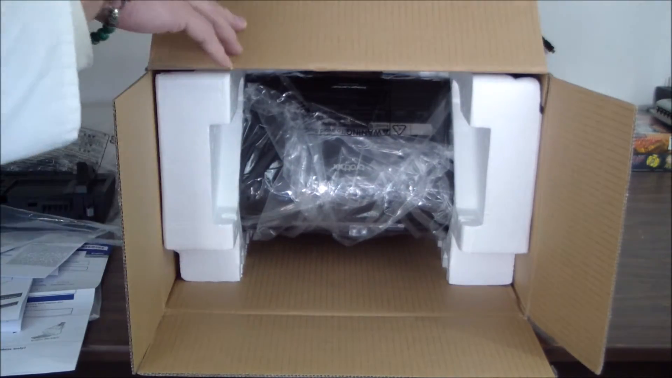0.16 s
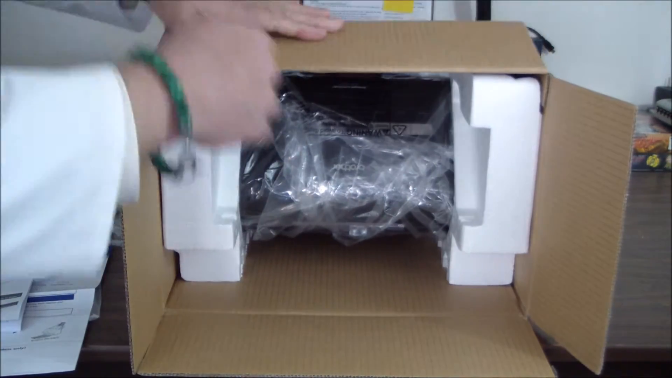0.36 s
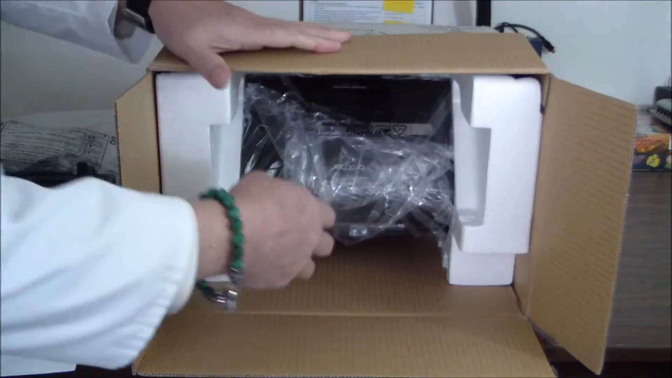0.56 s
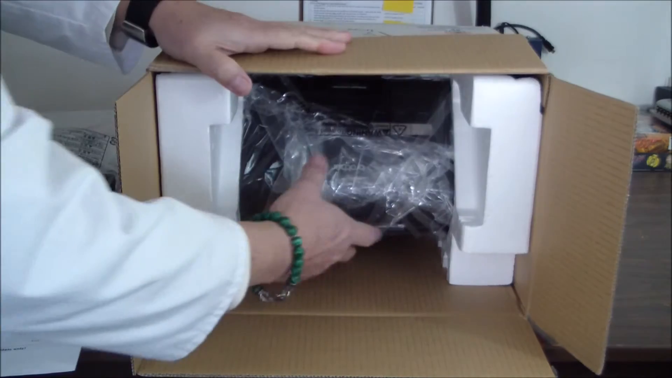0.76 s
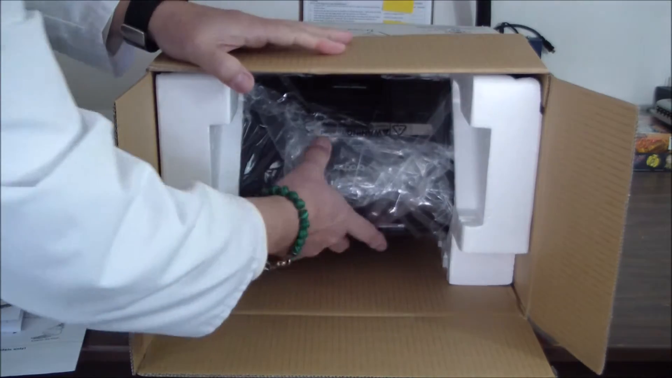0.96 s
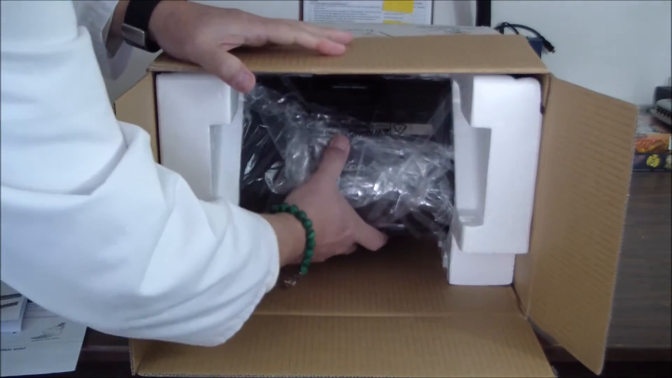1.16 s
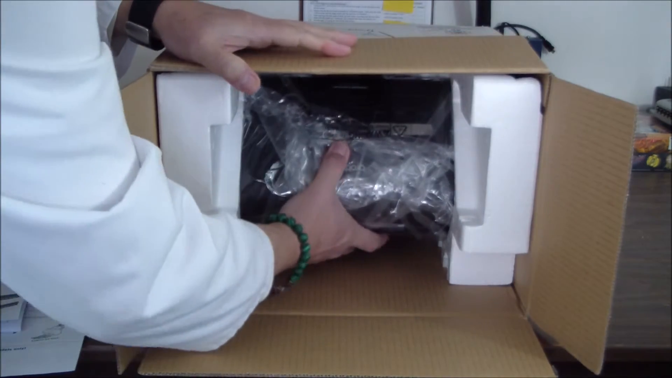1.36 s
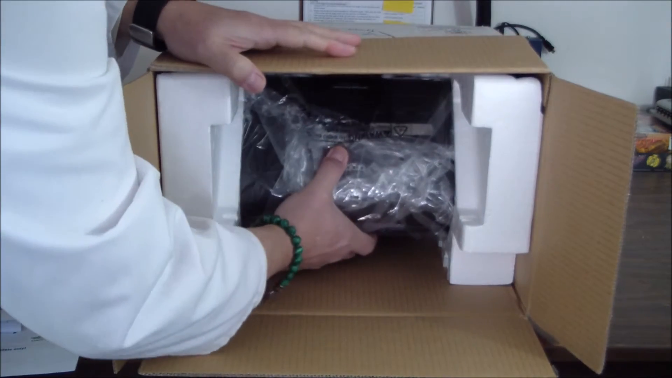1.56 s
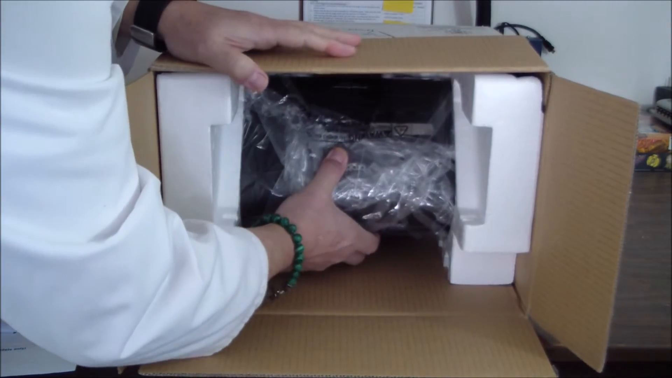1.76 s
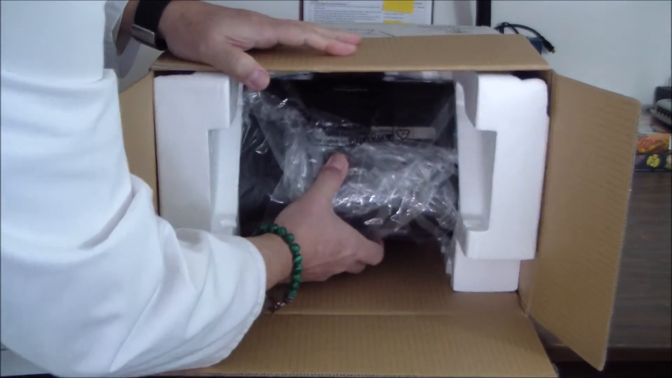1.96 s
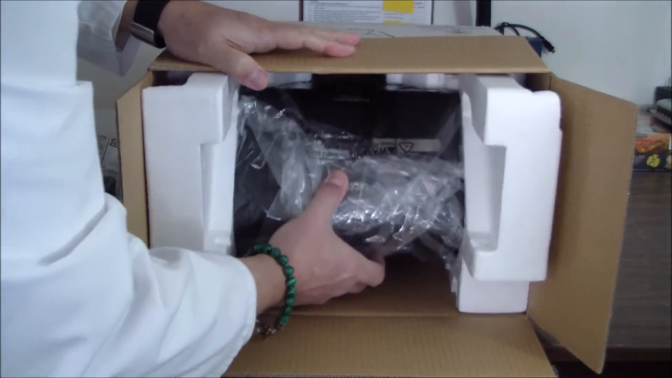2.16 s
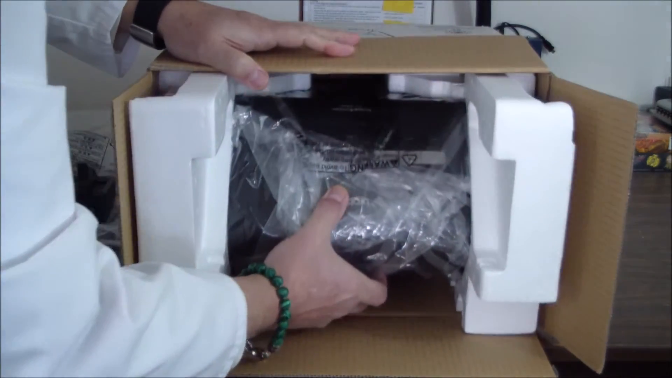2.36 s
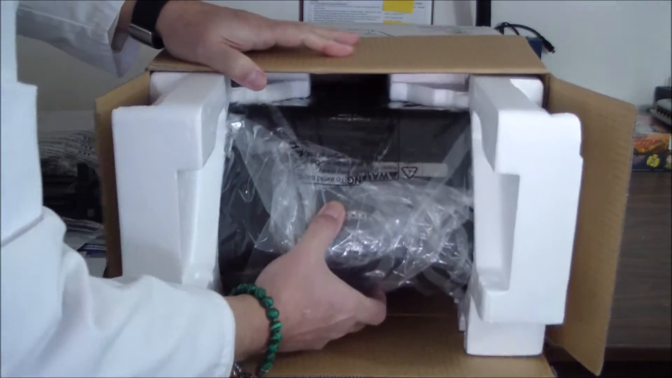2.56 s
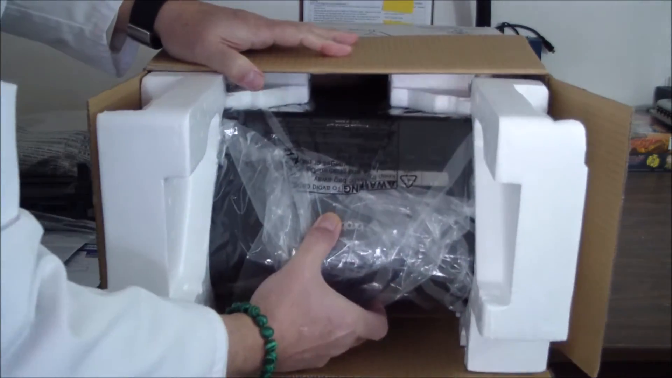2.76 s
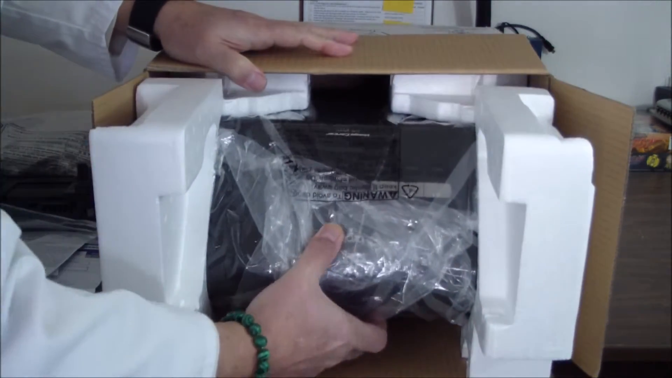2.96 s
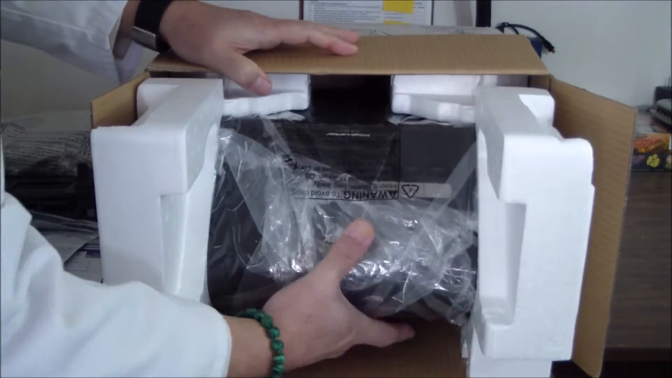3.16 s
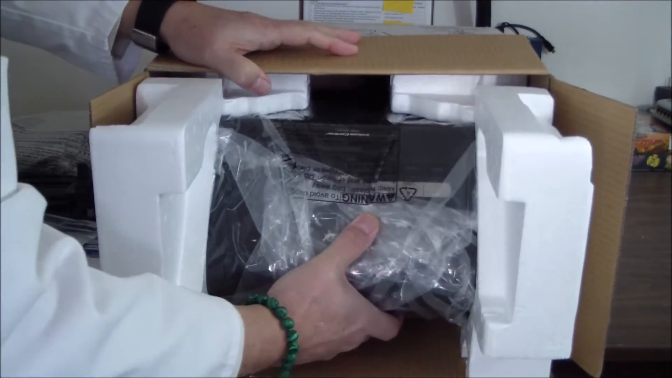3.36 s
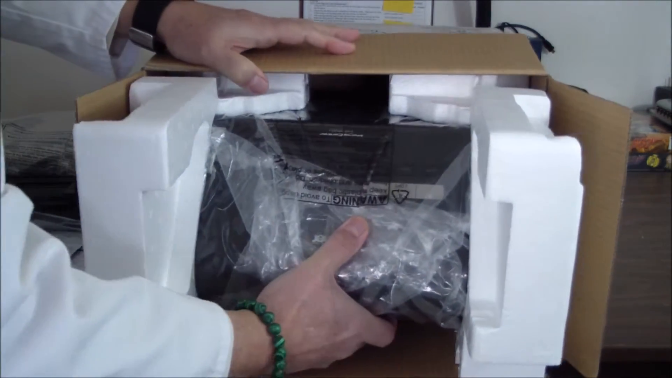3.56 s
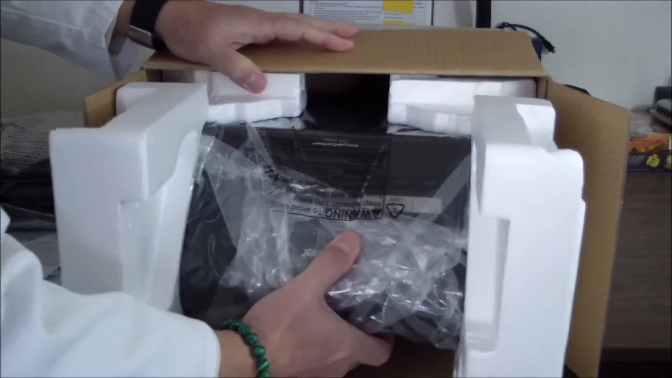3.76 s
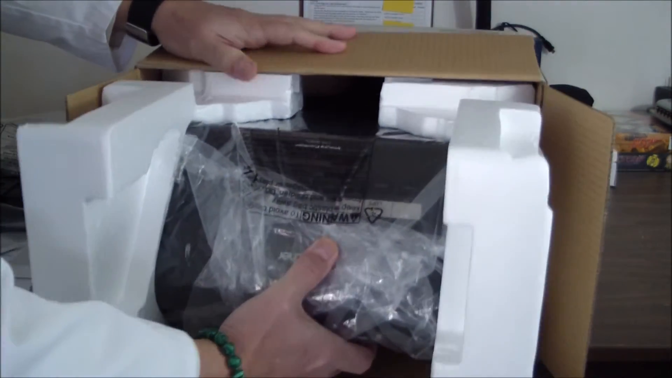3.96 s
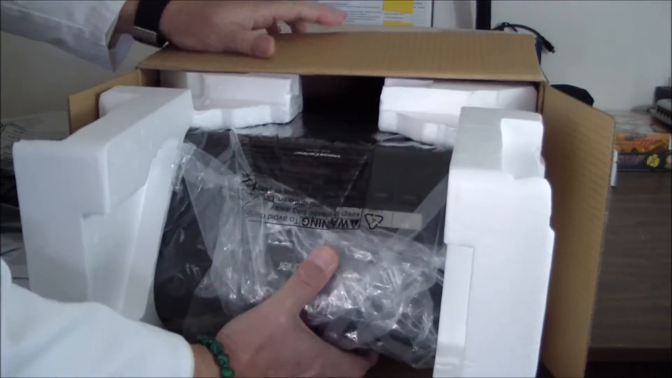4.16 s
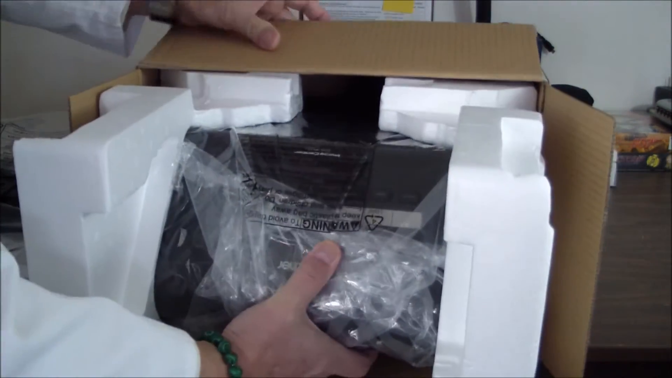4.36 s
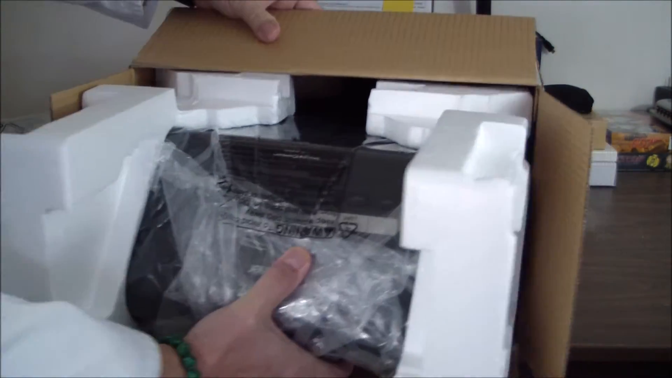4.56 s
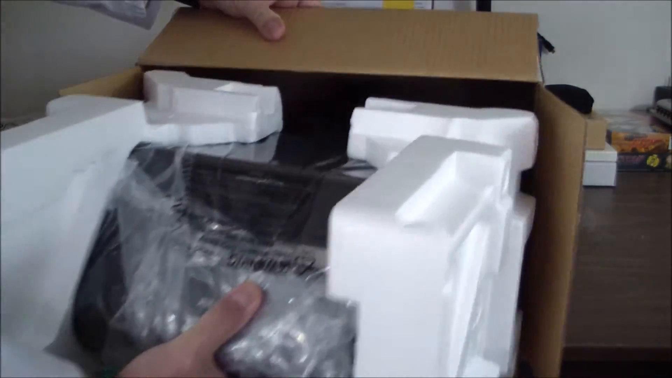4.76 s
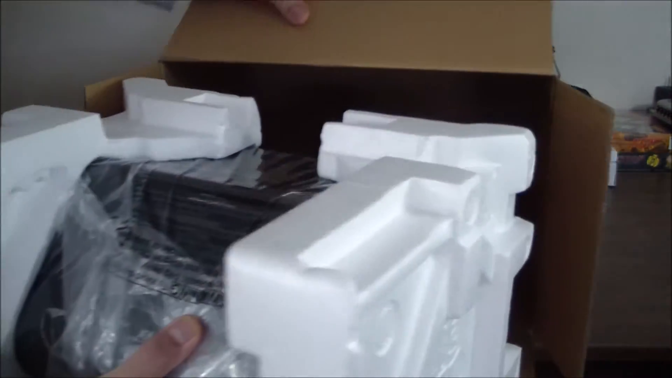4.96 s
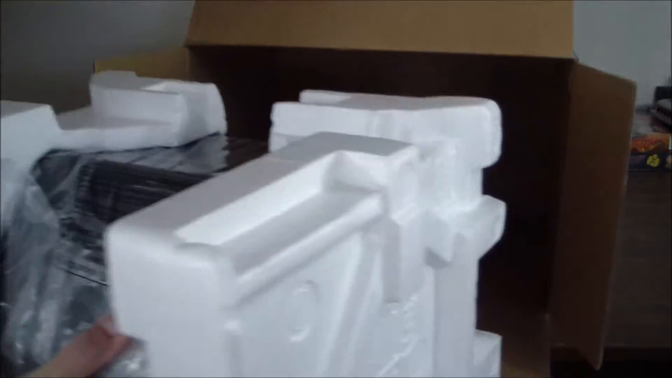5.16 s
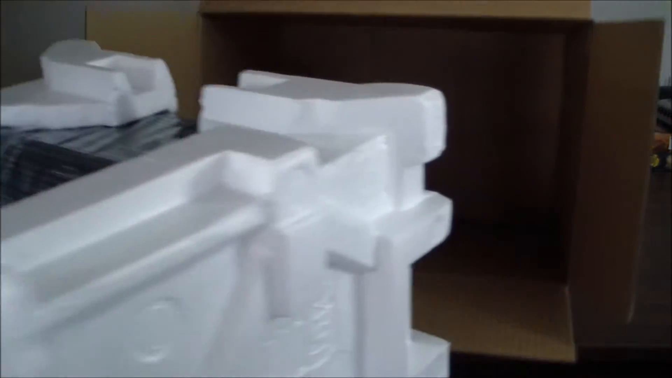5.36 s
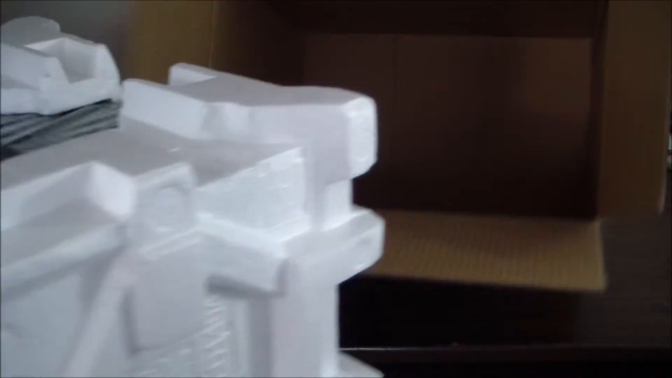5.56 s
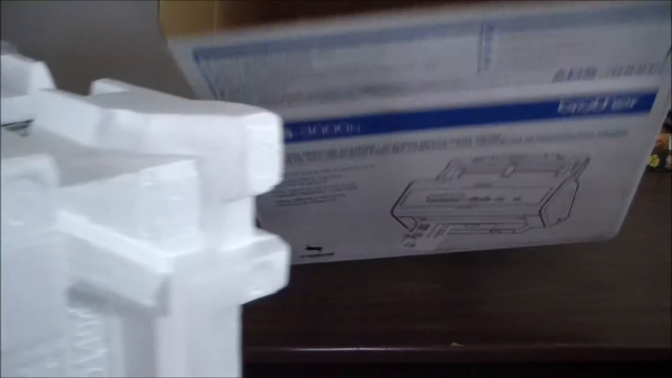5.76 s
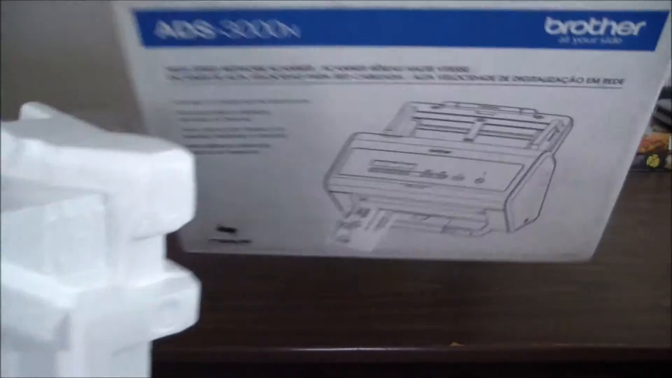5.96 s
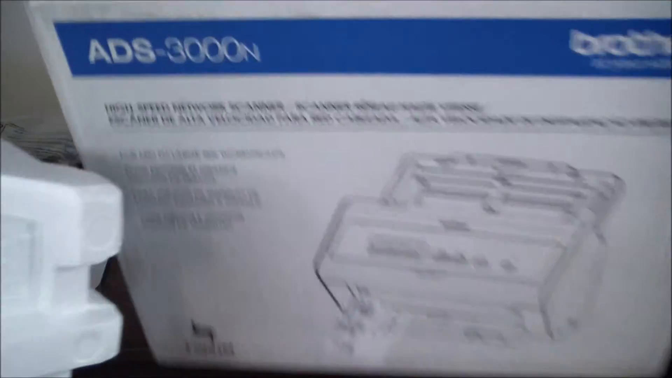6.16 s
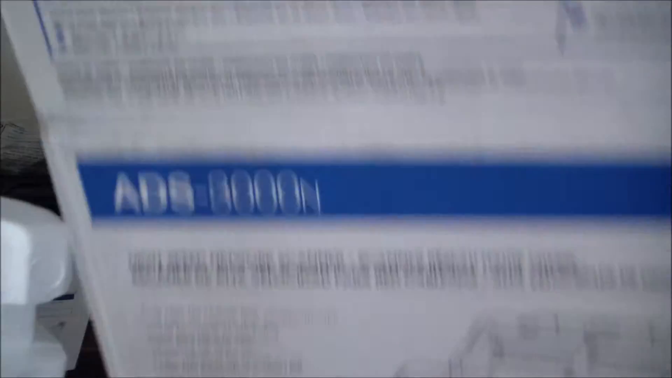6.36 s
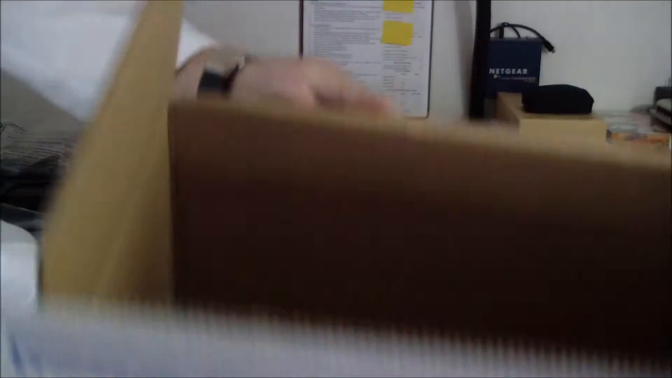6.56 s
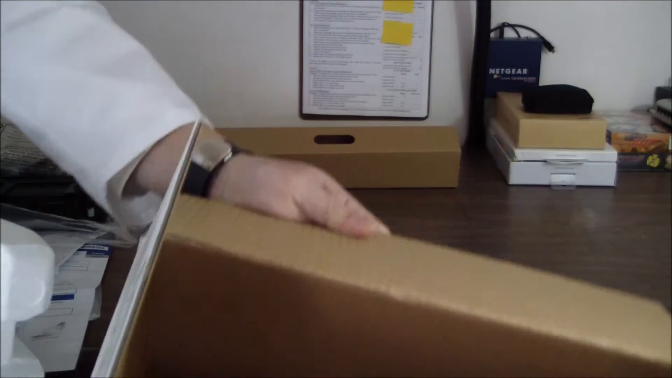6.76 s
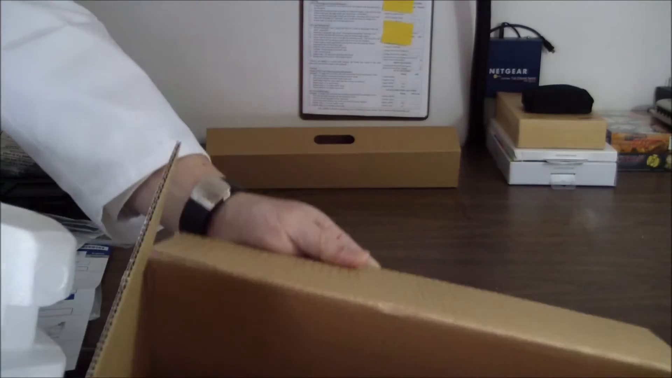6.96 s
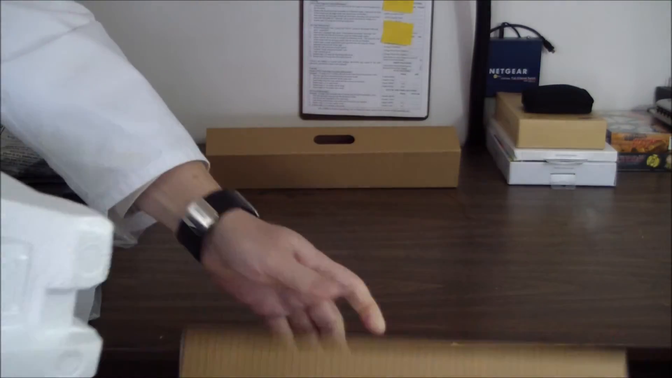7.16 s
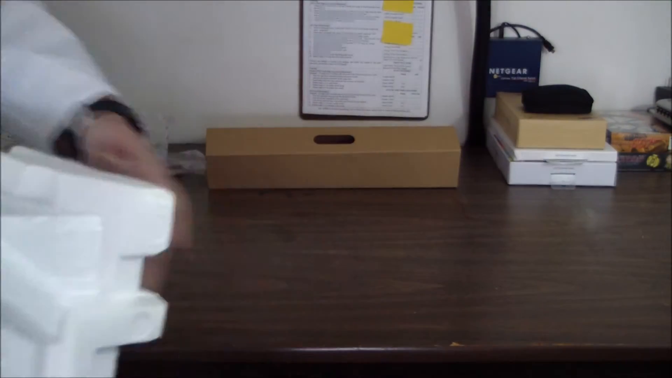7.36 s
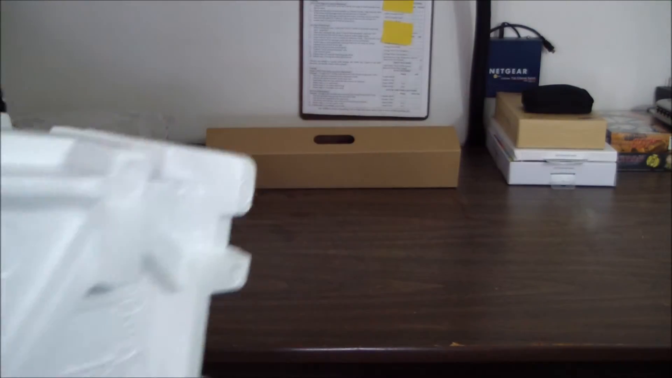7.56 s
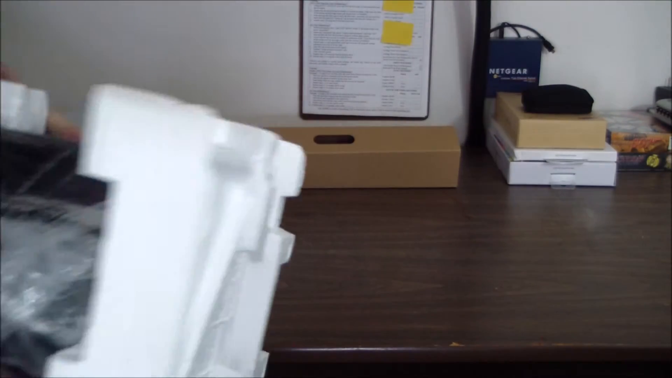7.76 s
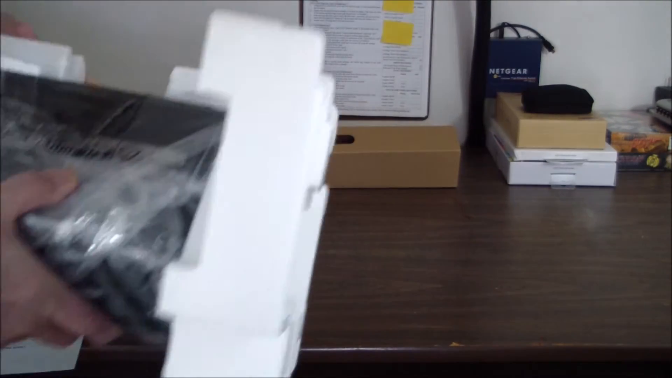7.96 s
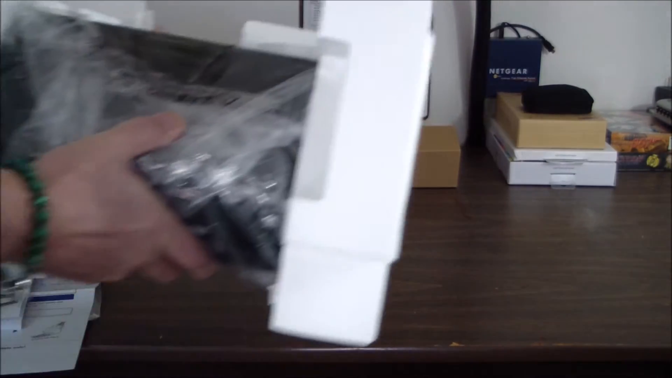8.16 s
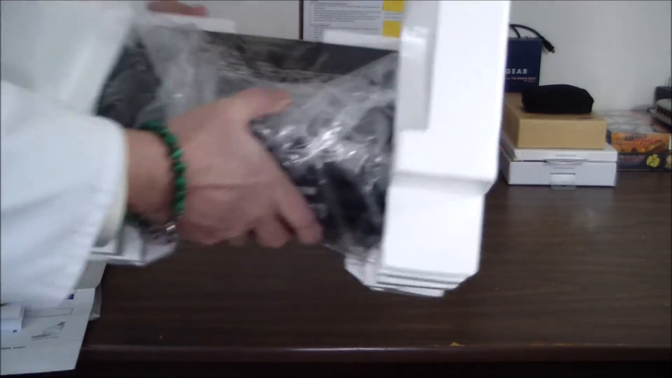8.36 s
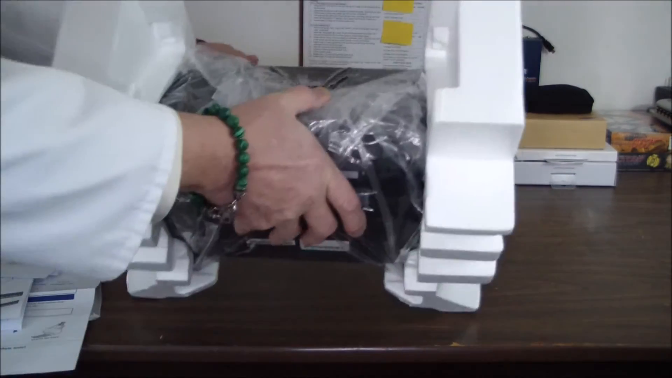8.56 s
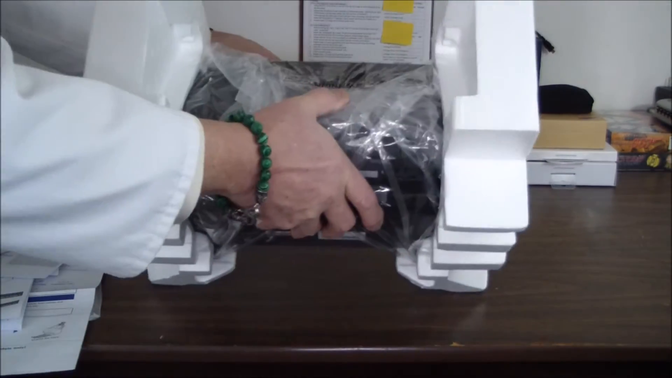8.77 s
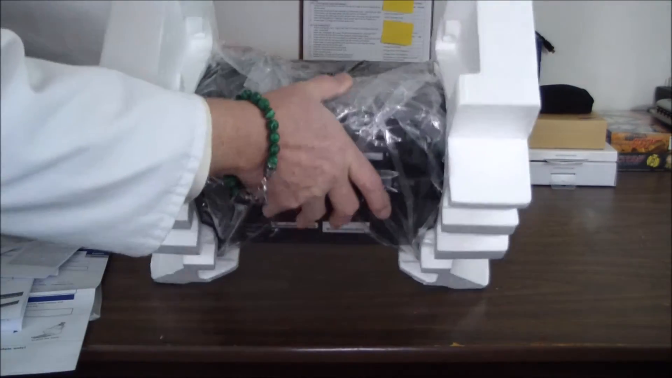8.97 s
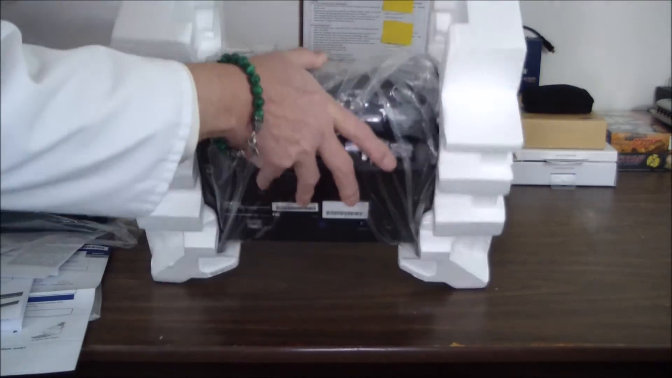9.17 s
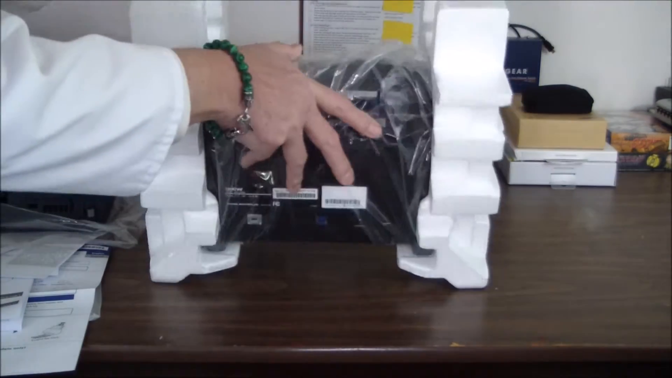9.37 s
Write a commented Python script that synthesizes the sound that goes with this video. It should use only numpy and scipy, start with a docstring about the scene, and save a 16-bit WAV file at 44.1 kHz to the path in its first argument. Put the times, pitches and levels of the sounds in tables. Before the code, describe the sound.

Foam packing hisses and rasps along a cardboard box, thin plastic snaps, then hollow knocks and desk thuds as a heavy item is set down.

```python
"""Foam hisses and rasps against card and wood as a heavy item held in foam blocks leaves a box for a desk.
Foam is noise made of tiny slips; where the block sings, a band of that noise stands out.
A thin plastic bag crinkles and snaps: short bursts of noise. The hollow box groans and knocks and the desk
thuds: decaying tones, with a crack of noise at each knock. A small room and stereo width finish the sound."""
import sys
import numpy as np
from scipy import signal
from scipy.fft import rfft, irfft
from scipy.io import wavfile
from scipy.ndimage import uniform_filter1d

SR = 44100
rng = np.random.default_rng(int(sys.argv[2]) if len(sys.argv) > 2 else 0)


def store_wav(level_fs):
    """Save 16-bit WAV to argv[1]."""
    pcm = np.round(np.clip(np.atleast_2d(level_fs), -1, 1) * 32767)
    wavfile.write(sys.argv[1], SR, pcm.T.astype(np.int16))


N = 415422  # length in samples

# quiet room, tone colour: f/Hz, relative level/dB
AIR_COLOUR = [(15, -31), (25, 17), (55, 21), (150, 0.5), (245, 14.5), (349, -0.5), (2460, -4.5),
              (6550, -13), (12200, -11), (15200, -6.5), (16500, -30)]
AIR_DB = -47  # average (rms) level of the quiet room
# foam beads letting go, tone colour: f/Hz, relative level/dB
HISS_COLOUR = [(4500, -23), (5500, -31), (6600, -23), (8000, -8), (10000, -6), (12200, -5), (15100, -8.5),
               (16500, -6)]
# foam face on card, tone colour: f/Hz, relative level/dB
RASP_COLOUR = [(500, -29), (850, -4.5), (1450, 3), (2500, 4.5), (3500, 4), (5300, 1.5), (6500, -3.5),
               (8000, -9.5)]
# card fibres, tone colour: f/Hz, relative level/dB
SCUFF_COLOUR = [(300, -9), (550, 0), (900, -2), (1300, -6.5), (2200, -13)]
# strokes of foam over card, wood or bag:
# start t/s, length t/s, rise from start to end level/dB, final bead hiss level/dB, final contact rasp level/dB
STROKES = [(0.0, 0.12, -8, -47, -50.5), (0.254, 0.084, -17, -35, -39.5), (0.396, 0.23, 3.5, -37.5, -42),
           (0.839, .06, 2, -35, -34), (0.94, 0.21, 3, -38, -35), (1.213, 0.06, 6, -37, -32.5),
           (1.34, 0.072, 7, -40, -34.5), (1.414, 0.19, -3, -37, -35), (1.712, 0.038, -5, -37.5, -34.5),
           (1.773, 1.178, -0.5, -20, -22.5), (3.013, 0.094, 7, -33, -31), (3.139, 0.15, 7.5, -24.5, -29.5),
           (3.354, 0.069, -4, -38, -35), (3.492, 0.18, 13, -16.5, -18.5), (3.669, .14, 2, -19.5, -23),
           (3.904, 0.18, 10.5, -21, -23.5), (4.107, 0.13, 12, -24, -30), (4.314, 0.16, 9, -24.5, -33.5),
           (4.554, .15, 0.5, -17, -28.5), (4.726, .13, -2, -22.5, -30), (4.824, 0.44, -4, -34.5, -42),
           (5.239, 0.067, 15, -23.5, -32), (5.37, .21, 17, -22.5, -30), (5.65, .06, 7, -33, -45),
           (5.77, 0.038, -4, -34, -35.5), (5.85, 0.015, 3, -34, -38), (5.954, 0.039, -2, -41, -42.5),
           (6.124, .18, -6, -39.5, -41.5), (6.346, 0.063, 1, -36.5, -41.5), (6.496, 0.057, 9, -34.5, -35),
           (6.83, 0.045, -1, -46, -36.5), (6.965, 0.093, 12, -34, -28.5), (7.088, 0.273, -2.5, -36, -39.5),
           (7.372, 0.035, -2, -32.5, -28.5), (7.454, 0.17, -1, -36.5, -40.5), (7.61, 0.079, 25, -21, -25),
           (7.692, 0.096, -4, -29.5, -30.5), (7.844, 0.066, 3, -32.5, -34), (7.978, 0.041, -5, -31, -30),
           (8.102, 0.11, 34, -22, -26.5), (8.265, 0.055, 4, -33, -35), (8.376, .11, 4.5, -23.5, -26.5),
           (8.487, 0.11, 9.5, -18.5, -20.5), (8.618, 0.072, 6, -23, -31.5), (8.725, 0.16, -1.5, -25, -32.5),
           (8.964, 0.11, 0, -37, -35.5), (9.064, 0.29, 8, -18.5, -24.5), (9.33, .1, 6, -24, -26)]
# light contact of foam and bag between strokes: t/s, hiss level/dB, rasp level/dB
LIGHT_TOUCH = [(0, -48, -48), (.8, -47, -47), (1.0, -31.5, -41), (1.65, -48, -48), (3.0, -62, -45),
               (3.9, -44, -33.5), (4.5, -31, -30), (5.4, -37, -39.5), (5.9, -51, -48.5), (6.9, -51.5, -51),
               (7.5, -43, -44), (8.4, -36, -38), (8.95, -49, -39.5), (9.42, -40, -40)]
# foam block singing in a fuzzy band as it is dragged: start t/s, length t/s, f/Hz, level against the rasp/dB
SINGS = [(1.84, 0.77, 3630, -7.5), (2.5, 0.59, 3700, -18), (3.694, 0.13, 5560, -7),
         (3.982, 0.13, 5670, -4.5), (4.54, 0.18, 5650, 2), (5.1, 0.23, 3950, -7), (6.3, .1, 3900, -9),
         (6.5, 0.11, 2480, -12), (6.947, 0.16, 950, -0.5), (8.05, 0.24, 2050, -3.5),
         (8.488, 0.21, 4120, -13), (9.15, .3, 4350, -15)]
# foam catching and skidding for a moment: t/s, hiss level/dB, rasp level/dB, length t/s, card scuff level/dB
SKIDS = [(0.237, -30.5, -41, 0.061, -45), (0.263, -35.5, -39, 0.13, -39.5), (1.1, -27, -28, 0.03, -31),
         (3.045, -31, -38, 0.053, -35), (6.33, -15, -24.5, 0.03, -57), (6.998, -36, -38, 0.075, -25.5),
         (7.994, -23, -45, 0.023, -27), (8.083, -31.5, -32.5, 0.058, -36), (8.669, -23, -38, 0.045, -41),
         (8.76, -27, -40, 0.052, -35)]
# box and desk shaken by handling: t/s, wall groan level/dB, deep shudder level/dB, card scuff level/dB
HANDLING = [(0.0, -57, -40.5, -47.5), (0.89, -41.5, -52, -44.5), (1.02, -38.5, -48, -35),
            (2.36, -48.5, -51, -44), (2.83, -47, -50, -40.5), (3.2, -38, -45, -41),
            (3.67, -44.5, -50, -39.5), (4.33, -34, -41.5, -34.5), (4.77, -40.5, -42, -41),
            (4.96, -34, -35, -36), (5.19, -33.5, -40, -39.5), (5.48, -33, -40, -45), (5.61, -40, -42, -45),
            (6.69, -55, -48, -48.5), (6.98, -43, -36, -43), (7.4, -52, -52, -47), (7.58, -25.5, -30, -32),
            (7.79, -25, -29, -33), (7.95, -26, -32, -36.5), (8.16, -39, -31, -51), (8.4, -49, -54, -41),
            (8.69, -38.5, -36.5, -37), (9.0, -39.5, -48, -44), (9.42, -39.5, -56, -34)]
# tones of the large box walls: f/Hz, relative level/dB, time to fall 60 dB when shaken t/s
WALLS = [(153, -3, 0.061), (204.2, -3.5, 0.12), (239, 4.5, 0.043), (282, -5, 0.097), (350.7, -7, 0.088),
         (396.8, -7, 0.13)]
# tones of the desk and the air in the box: f/Hz, relative level/dB, time to fall 60 dB when shaken t/s
DEEP = [(52.7, 0, 0.52), (88.7, 5.5, 0.1), (109, 2, 0.056)]
# tones of small panels and foam: f/Hz, relative level/dB, fall time before RING_WALLS stretches it t/s
FLAPS = [(472, 1, 0.11), (529.4, -4.5, 0.12), (621, 3.5, 0.072), (666, 0.5, 0.046), (780, -16, 0.06),
         (938, 0.5, 0.078), (1150, -19, 0.032)]
# crack of a knock: f/Hz, relative level/dB, fall time before RING_CRACK stretches it t/s
CRACK = [(650, 12, 0.12), (1000, 14, 0.087), (2050, 7.5, 0.036), (3570, 0.5, 0.021), (8100, -3.5, 0.019),
         (16000, -19, 0.017)]
# loaded panels wobbling on one note: t/s, level before its random drift/dB, f/Hz, rise t/s, length t/s
WOBBLES = [(0.238, -22.5, 154, 0.0023, 0.027), (4.975, -8, 250.7, 0.012, 0.059),
           (5.073, -12.5, 261.6, 0.012, 0.035), (5.496, -24, 56.5, 0.025, 0.046),
           (6.33, -25.5, 59, 0.0036, 0.028), (6.839, -18.5, 80, 0.004, 0.023),
           (7.433, -8.5, 92, 0.044, 0.11)]
# knocks on box and desk: t/s, wall peak level/dB, then relative to that: deep thud level/dB,
# hollow upper body level/dB, hard edge level before the crack's own factors/dB; wall pitch nearest the blow f/Hz
KNOCKS = [(0.243, -13, -9, -22, -13, 350), (1.121, -28.5, -29, -4, -20, 268),
          (1.526, -20, -35, -3, -8, 277), (3.769, -18.5, -15, -15, -29, 278),
          (4.114, -24, -15, -21, -26, 259), (4.32, -20, -26, -22, -15, 280),
          (4.395, -8, -37, -30, -12, 199), (4.486, -17, -14, -16, -13, 274),
          (4.745, -22.5, -5, -27, -30, 200), (4.839, -21, -27, -11, -6, 276),
          (4.927, -7.5, -33, -7, -19, 218), (4.96, -8.5, -19, -12, -40, 244),
          (5.208, -21, -25, -35, -28, 213), (5.326, -18.5, -9, -10, -24, 287),
          (5.376, -17.5, -11, -7, -17, 292), (5.44, -14.5, -14, -10, -15, 231),
          (5.491, -16, -15, -10, -15, 199), (5.597, -15.5, -8, -9, -10.5, 214),
          (5.79, -29, -22, -1, -3, 207), (5.873, -13.5, -13, -7, -11, 203), (5.993, -23, -5, -9, -13, 205),
          (6.109, -20, -11, -10, -15, 204), (6.134, -23.5, -20, -18, -25, 204),
          (6.841, -16, -22, -1.5, -5, 170), (7.045, -21.5, -20, -10, -18, 200),
          (7.381, -11, 6, -22, -4.5, 300), (7.418, -12, -21, -13, -12, 239),
          (7.542, -12, -13, -14, 2.5, 285), (7.686, -10, -18, -7, -4.5, 280),
          (7.717, -16, -17, -25, -21, 218), (7.776, -6.5, -9, -24, -5, 287),
          (7.903, -10.5, -21, -5, -11, 374), (8.001, -9.5, -12, -10, -14, 285),
          (8.465, -9, -10, -27, -4, 294), (8.54, -14, -33, -12, -13, 174), (8.595, -13, -25, -29, -11, 268),
          (8.802, -11.5, -29, -24, -6, 282), (8.829, -11.5, -13, -27, -26, 258)]
# bag gripped and crinkling finely: t/s, crinkle level/dB
GRIP = [(.85, -70), (.88, -30.5), (1.2, -35), (1.5, -27), (1.62, -36), (1.8, -48), (2.95, -65), (3.05, -31),
        (3.5, -40), (4.3, -52), (8.9, -76), (9.0, -30.5), (9.42, -33)]
# folds of the bag snapping: t/s, treble peak level/dB, fullness: lower part relative to the treble, level/dB
SNAPS = [(0.8779, -2.5, -27), (0.8893, -0.5, -15), (0.8936, -3, -10), (0.9048, -2, -16), (1.0104, -5, -11),
         (1.016, -1.5, -8), (1.057, -9, -14), (1.073, -1, -26), (1.105, -7, -10), (1.1234, -16, -12),
         (1.1947, -14.5, 0.5), (1.244, -15, -7), (1.3209, -17, -12), (1.3358, -3.5, -8),
         (1.3612, -7.5, -12), (1.44, -9, -6), (1.4666, -8, -12), (1.4817, -6, -15), (1.4934, -9, -14),
         (1.5618, -12, -12), (1.5718, -9.5, -0.5), (1.5932, -9.5, -8), (1.6774, -15.5, -1),
         (1.728, -11.5, -7), (3.057, -3, -4.5), (3.0749, -8, -12), (3.0874, -7, -10), (3.107, -4.5, -10.5),
         (3.3858, -6.5, -9), (4.279, -5.5, -10), (7.0684, -24, -12), (7.3994, -22, -12), (7.4205, -21, -7),
         (7.4659, -15, -2), (8.1605, -11.5, 1), (9.0324, -14, -12), (9.0543, -2, -8), (9.1977, -8, -16),
         (9.353, -8, -19), (9.359, -10, -14), (9.4056, -4, -14)]
# stereo width by pitch: f/Hz, level of a random-phase copy, opposite in each channel, against the shared sound/dB
STEREO_WIDTH = [(60, -12), (200, -27.5), (600, -36.5), (1400, -50), (3000, -124), (5500, -25), (10000, -8),
                (15000, -4.5)]

# a stroke gathers speed over a fixed time (s) plus a share of its length, from this far down, then dies away
GATHER_S, GATHER_SHARE, FROM_DB, STOP_DB_PER_S = 0.02, 0.11, -22, 300
PATCH_DB, FINE_DB = 1.2, 2.4  # depth (rms) of the wide and of the thin swells in rubbing noise
SING_WIDTH = 0.28  # width of each singing filter as a share of its pitch
CATCH_DB, FOCUS_DB = 2.0, 14  # random spread of each tone in a blow; fall in dB per octave from the struck pitch
RING_WALLS, RING_DEEP, RING_CRACK = 1.65, 1.3, 1.73  # factors on the fall times after a knock
FOLD_S = 0.00045  # main decay time of a flipping fold of the bag (s)
ROOM_DB, TAIL_SIDE_DB = -15, -20  # room tail of the hits; its opposite part in the channels against that tail
BAND_LIMIT_HZ = 15750  # upper band limit of the recorder


def gain_of(db):
    """Turns decibels into a gain."""
    return 10 ** (np.asarray(db) / 20)


def evened(x):
    """Scales a sound to an average (rms) level of one."""
    return x / np.sqrt(np.mean(x ** 2) + 1e-20)


def read(hz, f, value):
    """Reads a table between its points on a log-frequency axis."""
    return np.interp(np.log(hz + 1), np.log(np.asarray(f) + 1), value)


def curves(rows):
    """Draws every column of a table as a curve over the whole scene."""
    seconds, *columns = np.transpose(rows)
    return [np.interp(np.arange(N) / SR, seconds, column) for column in columns]


def add(mix, start, sound):
    """Mixes a sound in at a start time in seconds."""
    part = mix[round(start * SR):][:len(sound)]
    part += sound[:len(part)]


def coloured(x, points):
    """Gives x the tone colour of a table, which falls away outside its ends."""
    f, db = np.transpose(points)
    hz = np.fft.rfftfreq(len(x), 1 / SR)
    octaves_above = np.maximum(np.log2((hz + 1) / f[-1]), 0)
    octaves_below = np.maximum(np.log2(f[0] / (hz + 1)), 0)
    gain = gain_of(read(hz, f, db) - 31 * (octaves_above + octaves_below))
    return irfft(rfft(x) * gain, len(x))


def slips(per_s, spread_db, smooth):
    """Stick and slip: tiny releases of uneven size over a smooth rub."""
    size = gain_of(spread_db * np.minimum(rng.exponential(1, N), 5))
    size = size * (rng.random(N) < per_s / SR)
    releases = evened(size * rng.standard_normal(N))
    return smooth * rng.standard_normal(N) + (1 - smooth) * releases


def flutter(seconds, depth_db):
    """Pressure of the hand wavers: a smoothed random gain."""
    return gain_of(depth_db * evened(uniform_filter1d(rng.standard_normal(N), int(seconds * SR))))


def patchy(x):
    """Random gain over pitch and time: wide bands swell briefly, and thin ones for longer."""
    z = signal.stft(x, nperseg=1024, noverlap=768)[2]
    wide, thin = rng.standard_normal((2,) + z.shape)
    # axis 0 is pitch, axis 1 is time
    wide = evened(uniform_filter1d(uniform_filter1d(wide, size=14, axis=0), size=8, axis=1))
    thin = evened(uniform_filter1d(uniform_filter1d(thin, size=2, axis=0), size=16, axis=1))
    swollen = z * gain_of(PATCH_DB * wide + FINE_DB * thin)
    return evened(signal.istft(swollen, nperseg=1024, noverlap=768)[1][:N])


def shaken(modes):
    """Random pushes keep each tone of a body ringing."""
    out, push = np.zeros(N), slips(300, 3.5, 0.4)
    for hz, db, t60 in modes:
        r = np.exp(-np.log(1000) / (t60 * SR))
        feedback = [1, -2 * r * np.cos(2 * np.pi * hz / SR), r * r]
        out += gain_of(db) * evened(signal.lfilter([1, 0, -1], feedback, push))
    return evened(out)


def resonate(x, hz, width):
    """Keeps a band around the curve hz: shifts it down to zero, smooths, and shifts back."""
    turn = np.exp(2j * np.pi * np.cumsum(hz) / SR)
    r = np.exp(-np.pi * width / SR)
    return 2 * (turn * signal.lfilter([1 - r], [1, -r], x / turn)).real


def quiet_room():
    """The room at rest is steady noise with a tone colour of its own."""
    return gain_of(AIR_DB) * evened(coloured(rng.standard_normal(N), AIR_COLOUR))


def strokes():
    """Each stroke gathers speed, swells or eases, and stops: gains for hiss and rasp."""
    t, power = np.arange(N) / SR, gain_of(curves(LIGHT_TOUCH)) ** 2
    for start, length, swell_db, hiss_db, rasp_db in STROKES:
        near = slice(round(start * SR), round((start + length + 0.25) * SR))
        u = t[near] - start
        gather_db = FROM_DB * np.clip(1 - u / (GATHER_S + GATHER_SHARE * length), 0, 1) ** 2
        rise_db = -swell_db * np.clip(1 - u / length, 0, 1)
        stop_db = -STOP_DB_PER_S * np.maximum(u - length, 0)
        shape_db = gather_db + rise_db + stop_db
        power[:, near] += gain_of(np.array([[hiss_db], [rasp_db]]) + shape_db) ** 2
    return np.sqrt(power)


def foam(skid):
    """The same slips sound as a fine hiss and as a broader rasp, with the block singing inside the rasp."""
    hiss_gain, rasp_gain = strokes()
    rub = patchy(slips(4000, 1.4, 0.61) * flutter(0.018, 0.7))
    hiss = evened(coloured(rub, HISS_COLOUR))
    rasp = evened(coloured(rub, RASP_COLOUR)) + singing(rub)
    return np.hypot(hiss_gain, skid[0]) * hiss + np.hypot(rasp_gain, skid[1]) * rasp


def handling(skid):
    """Walls groan, the desk shudders and card scuffs as the load moves."""
    groan_db, deep_db, scuff_db = curves(HANDLING)
    groan = gain_of(groan_db) * shaken(WALLS)
    shudder = gain_of(deep_db) * shaken(DEEP)
    scuff = patchy(coloured(slips(1500, 0.49, 0.77), SCUFF_COLOUR))
    return groan + shudder + np.hypot(gain_of(scuff_db), skid[2]) * scuff


def skids():
    """Each skid starts almost at once and stops nearly as fast: gains for hiss, rasp and scuff."""
    t, out = np.arange(N) / SR, np.zeros((3, N))
    for start, hiss_db, rasp_db, length, scuff_db in SKIDS:
        rise = np.clip((t - start) / 0.0011, 0, 1)
        fall = np.exp(-np.maximum(t - start - length, 0) / 0.0032)
        out += gain_of([[hiss_db], [rasp_db], [scuff_db]]) * rise * fall
    return out


def wobble(start, db, hz, rise, length):
    """One panel note that swells, holds unevenly and is damped."""
    t = np.arange(0, length + 0.08, 1 / SR)
    swell = np.sin(np.pi / 2 * np.clip(t / rise, 0, 1))
    shape = swell * np.exp(-np.maximum(t - length, 0) / 0.009 - t / 0.16)
    # one slow drift moves both pitch and level
    drift = evened(uniform_filter1d(rng.standard_normal(len(t)), size=500))
    turns = 2 * np.pi * np.cumsum(hz * (1 + 0.02 * drift)) / SR
    note = np.sin(turns) + 0.056 * np.sin(2 * turns)
    return start, gain_of(db + 3.9 * drift) * shape * note


def ring(modes, t, factor, chance, near_hz):
    """One blow: the modes near the struck pitch ring most, and soft card takes a few ms to move."""
    out = np.zeros(len(t))
    for (hz, db, t60), catch, detune in zip(modes, chance[:9], chance[9:]):
        caught_db = db + CATCH_DB * catch - FOCUS_DB * abs(np.log2(hz / near_hz))
        tone = np.sin(2 * np.pi * hz * (1 + 0.028 * detune) * t)
        out += gain_of(caught_db - 60 * t / (t60 * factor)) * tone
    out = out * (1 - np.exp(-t / 0.0047))
    return out / abs(out).max()


def crack_of(noise, t):
    """Hard edges meet: a short pulse of pressure, and noise whose bands die at their own rates."""
    hz, frame, z = signal.stft(noise, SR, nperseg=256)
    f, level_db, t60 = np.transpose(CRACK)
    fall_db = 60 * frame / read(hz, f, t60)[:, None] / RING_CRACK
    gain = gain_of(read(hz, f, level_db)[:, None] - fall_db) * (hz > 400)[:, None]
    crack = signal.istft(z * gain, SR, nperseg=256)[1][:len(t)]
    # first contact: one short pulse of pressure
    u = t / 0.00025
    pulse = u * (1 - u / 2) * np.exp(-u) * np.e
    return 2.11 * crack / abs(crack).max() - 2.9 * pulse


def knock(start, db, thud_db, body_db, edge_db, near_hz, chance, noise):
    """A blow rings walls and flaps, thuds in the deep modes and cracks at the hard edge."""
    t = np.arange(len(noise)) / SR
    walls = ring(WALLS, t, RING_WALLS, chance, near_hz)
    deep = gain_of(thud_db) * ring(DEEP, t, RING_DEEP, chance[::-1], 83)
    flaps = gain_of(body_db) * ring(FLAPS, t, RING_WALLS, -chance, 596)
    crack = gain_of(edge_db) * crack_of(noise, t)
    return start, gain_of(db) * (walls + deep + flaps + crack)


def room(x):
    """Short tail of a small furnished room: sparse echoes of random sign that die away."""
    t = np.arange(0.004, 0.3, 0.0005)
    place = (t * SR).astype(int) + rng.integers(0, 20, len(t))
    taps = np.zeros(SR // 3)
    taps[place] = rng.choice([-1., 1.], len(t)) * gain_of(-60 * t / 0.15)
    return signal.oaconvolve(x, taps / np.linalg.norm(taps))[:N]


def crinkle():
    """Many small folds of the bag flip in clumps, each a tiny burst of noise."""
    folds = slips(350, 3.5, 0.03) * flutter(0.025, 4.0)
    t = np.arange(200) / SR
    burst = rng.standard_normal(200) * np.exp(-t / FOLD_S)
    folds = signal.oaconvolve(folds, burst)[:N]
    sound = evened(coloured(folds, HISS_COLOUR) + 0.39 * coloured(folds, RASP_COLOUR))
    return gain_of(curves(GRIP)[0]) * sound


def snap(start, db, full_db, noise):
    """A fold flips over: a click that starts at once and dies away within about a millisecond, with a fainter
    short tail."""
    t = np.arange(len(noise)) / SR
    burst = noise * (np.exp(-t / FOLD_S) + 0.28 * np.exp(-t / 0.0027))
    high, low = coloured(burst, HISS_COLOUR), coloured(burst, RASP_COLOUR)
    return start, gain_of(db) * (high / abs(high).max() + gain_of(full_db) * low / abs(low).max())


def singing(rub):
    """The dragged block sings: each song swells and fades on its own band of the rub."""
    out = np.zeros(N)
    for start, length, hz, db in SINGS:
        part = rub[round(start * SR):round((start + length) * SR)]
        band = np.full(len(part), hz)
        # the filter is run twice for steeper sides
        once = resonate(part, band, SING_WIDTH * hz)
        song = evened(resonate(once, band, SING_WIDTH * hz))
        swell = np.sin(np.linspace(0, np.pi, len(part))) ** 0.5
        add(out, start, gain_of(db) * swell * song)
    return out


def widened(mid):
    """Stereo width by pitch: a random-phase copy is added to one channel and taken from the other."""
    hz, frame, z = signal.stft(mid, SR, nperseg=256)
    turn = np.exp(2j * np.pi * rng.random(z.shape))
    width = gain_of(read(hz, *np.transpose(STEREO_WIDTH)))[:, None]
    side = signal.istft(z * turn * width, SR, nperseg=256)[1][:N]
    return np.array([mid + side, mid - side])


def scene():
    """Rubbing, hits and the quiet room, spread over two channels."""
    air = quiet_room()
    skid = skids()
    rubbed = foam(skid) + crinkle() + handling(skid) + air
    hits = np.zeros(N)
    for row in WOBBLES:
        add(hits, *wobble(*row))
    for row in KNOCKS:
        add(hits, *knock(*row, rng.standard_normal(18), rng.standard_normal(12000)))
    for row in SNAPS:
        add(hits, *snap(*row, rng.standard_normal(1024)))
    tail = gain_of(ROOM_DB) * room(hits)
    # a second, separate tail enters the channels with opposite signs
    sideways = gain_of(ROOM_DB + TAIL_SIDE_DB) * room(hits)
    return widened(rubbed + hits + tail) + [sideways, -sideways]


def record(dry):
    """The recorder cuts peaks off at full scale, then removes what lies above its band limit."""
    held = np.clip(dry, -1, 1)
    lowpass = signal.firwin(1023, BAND_LIMIT_HZ, window=("kaiser", 9), fs=SR)
    return signal.oaconvolve(held, lowpass[None], "same")


dry = scene()
out = record(dry)
store_wav(out)
```